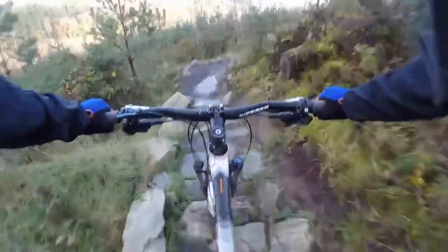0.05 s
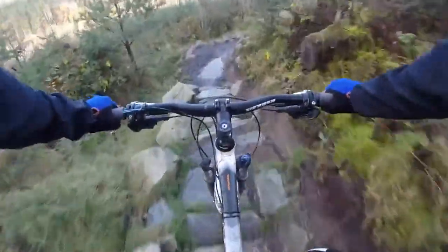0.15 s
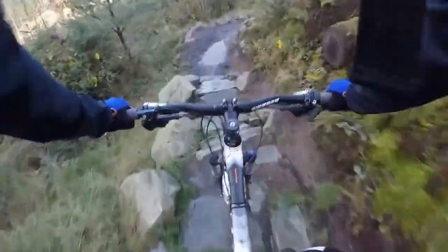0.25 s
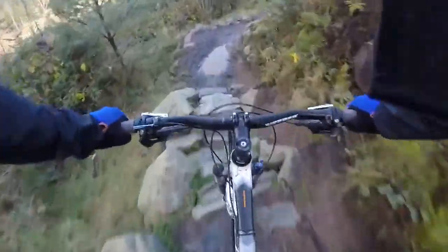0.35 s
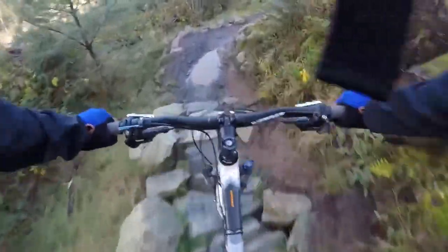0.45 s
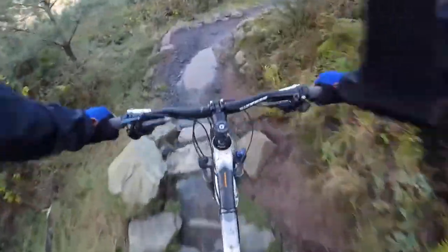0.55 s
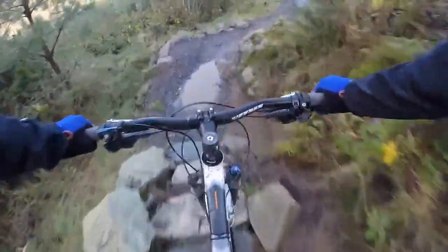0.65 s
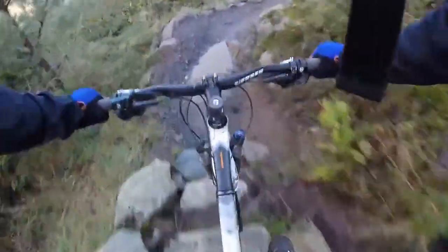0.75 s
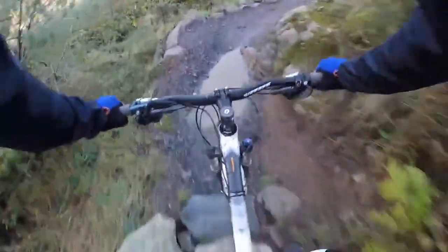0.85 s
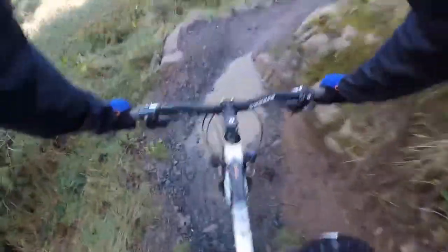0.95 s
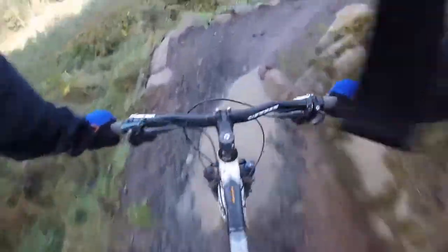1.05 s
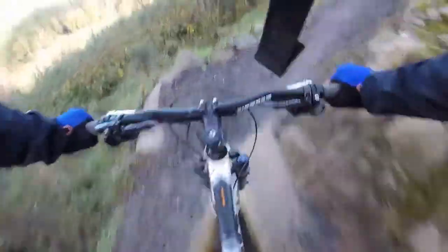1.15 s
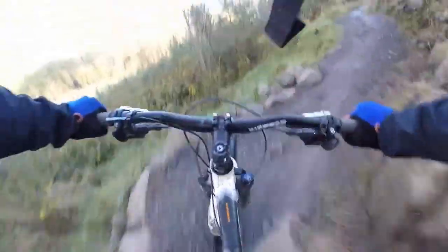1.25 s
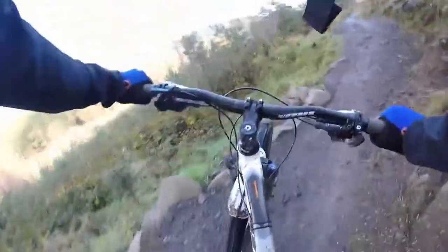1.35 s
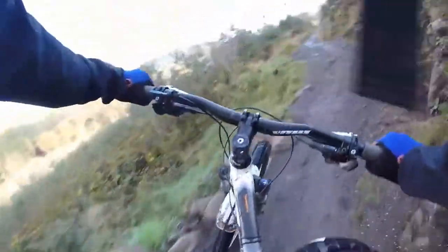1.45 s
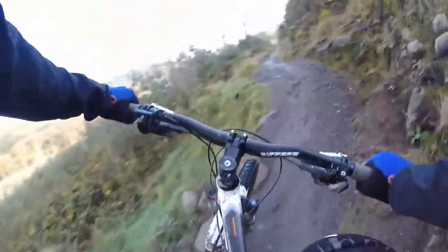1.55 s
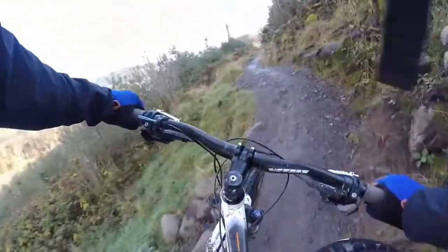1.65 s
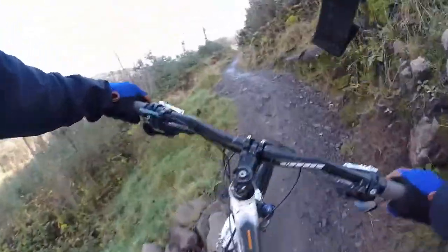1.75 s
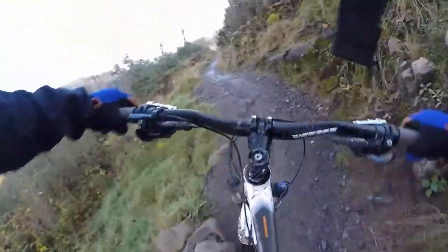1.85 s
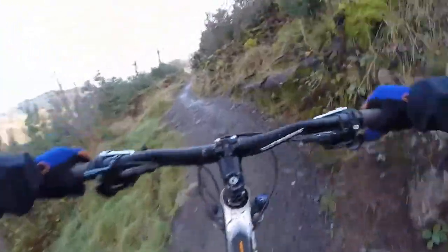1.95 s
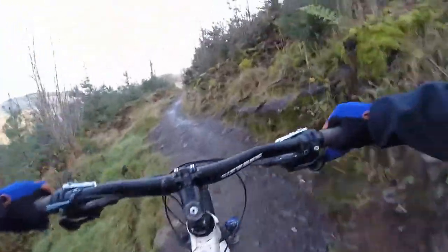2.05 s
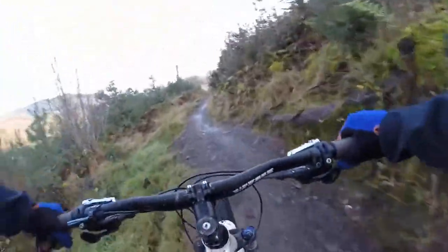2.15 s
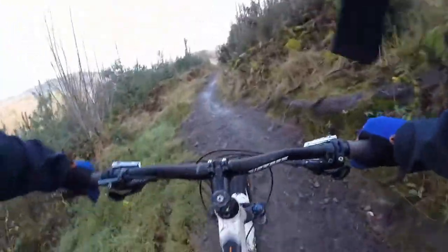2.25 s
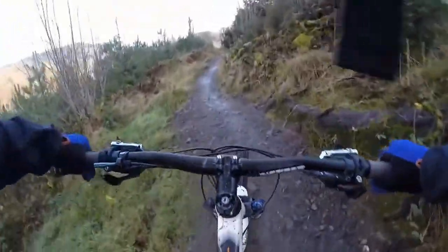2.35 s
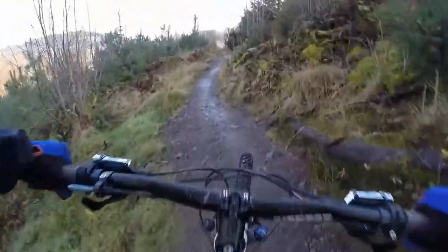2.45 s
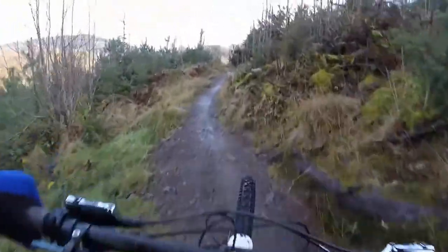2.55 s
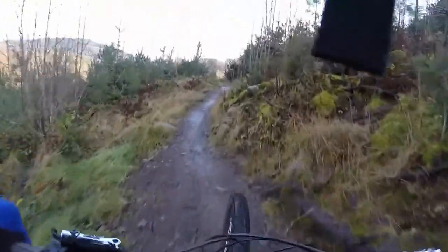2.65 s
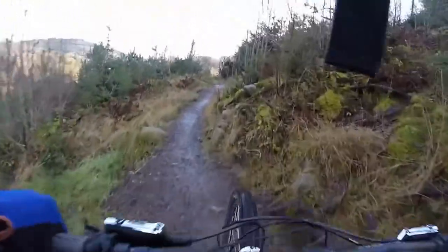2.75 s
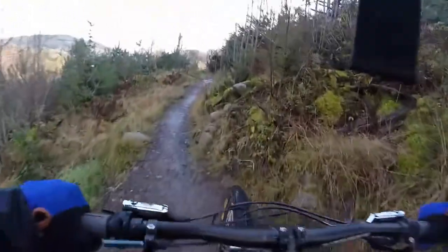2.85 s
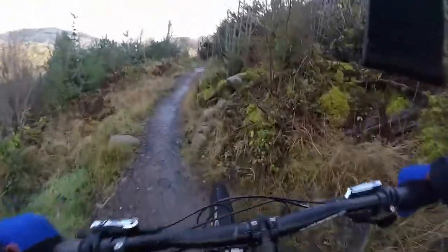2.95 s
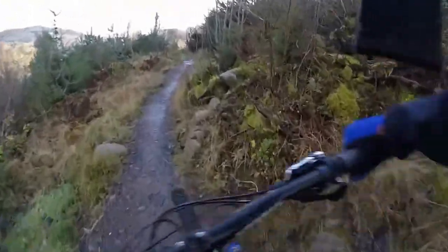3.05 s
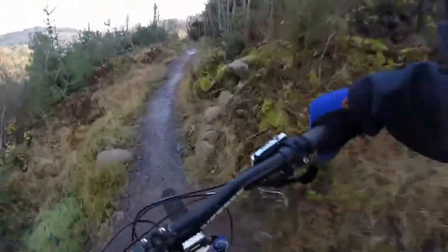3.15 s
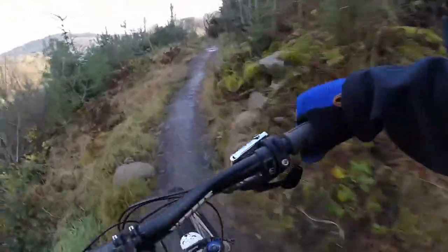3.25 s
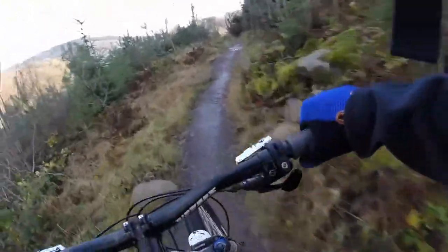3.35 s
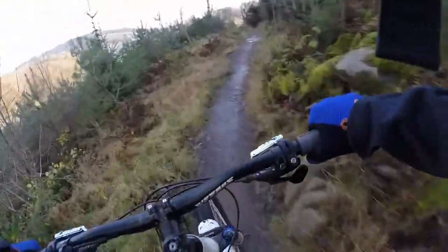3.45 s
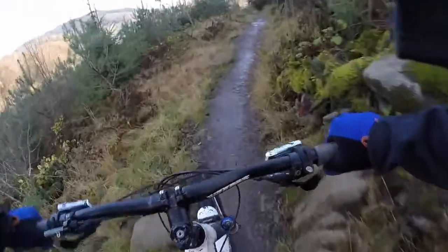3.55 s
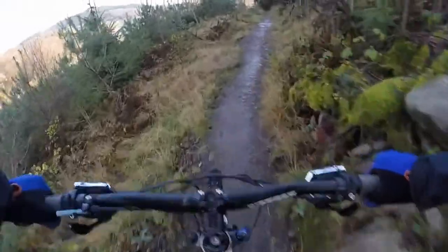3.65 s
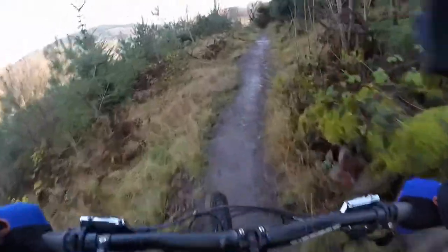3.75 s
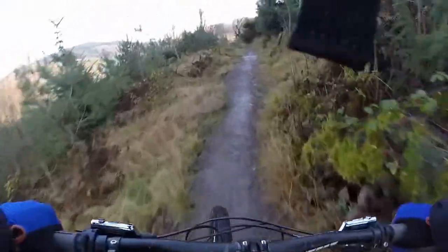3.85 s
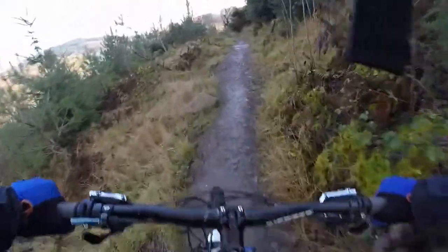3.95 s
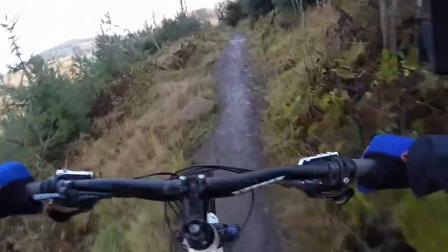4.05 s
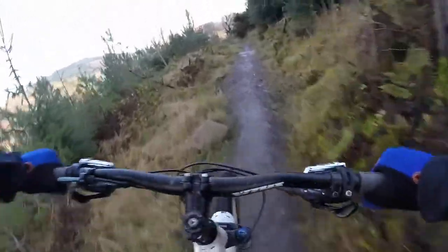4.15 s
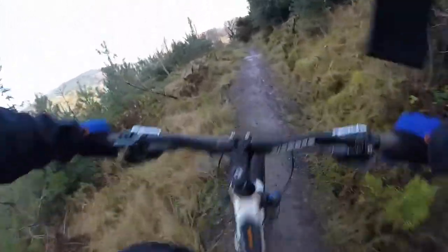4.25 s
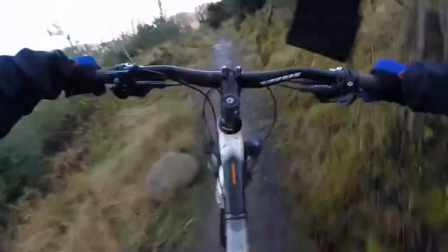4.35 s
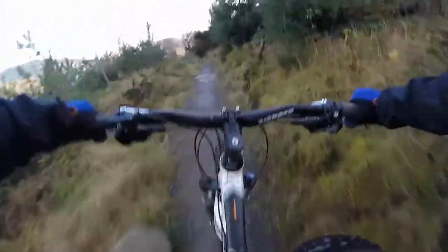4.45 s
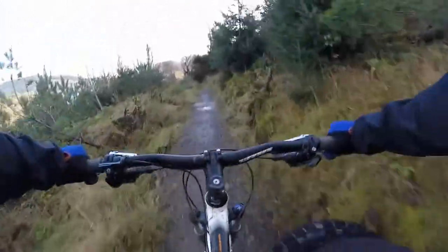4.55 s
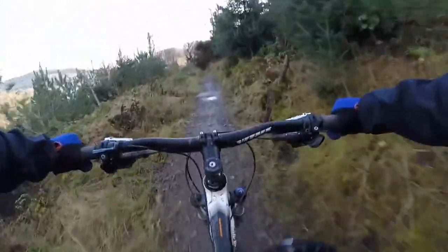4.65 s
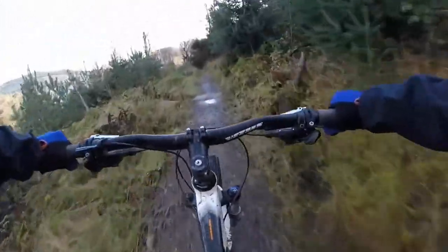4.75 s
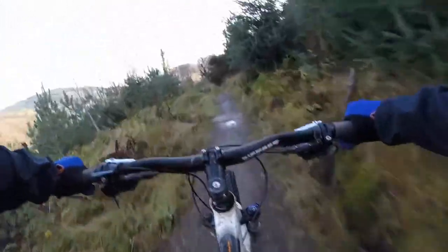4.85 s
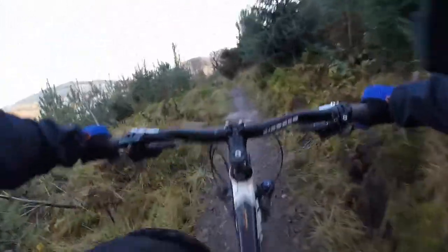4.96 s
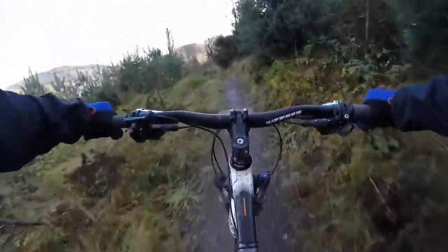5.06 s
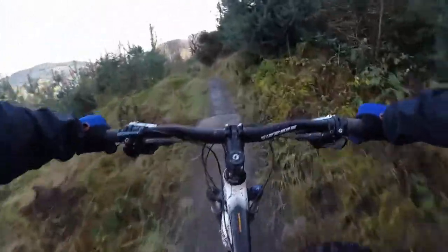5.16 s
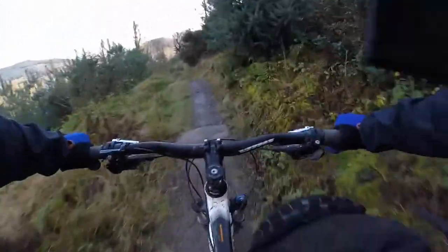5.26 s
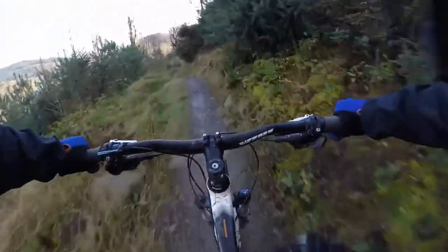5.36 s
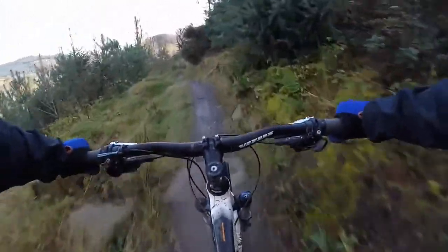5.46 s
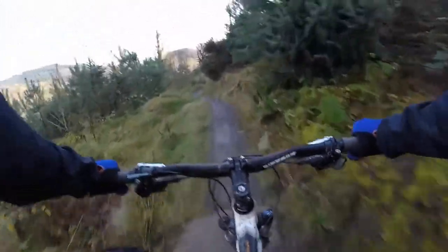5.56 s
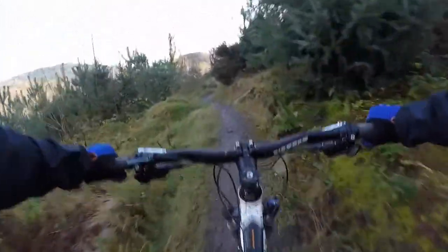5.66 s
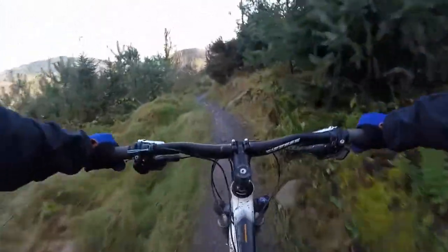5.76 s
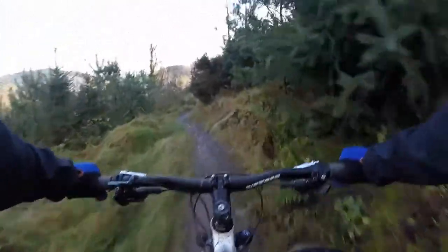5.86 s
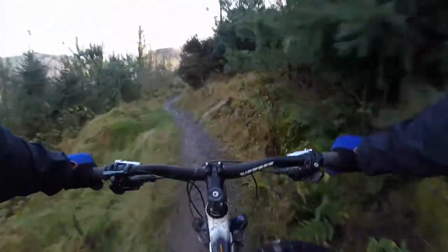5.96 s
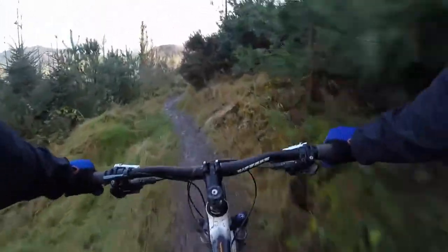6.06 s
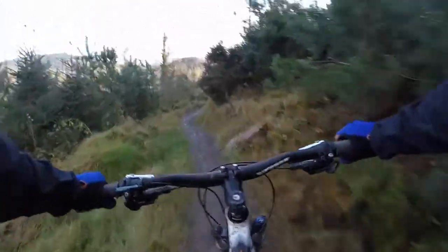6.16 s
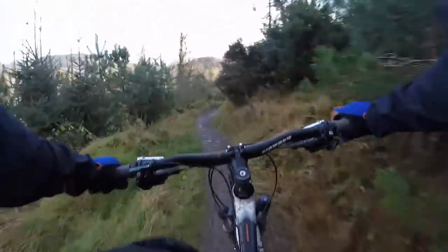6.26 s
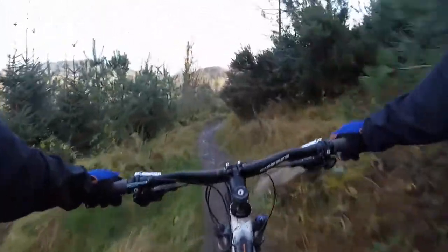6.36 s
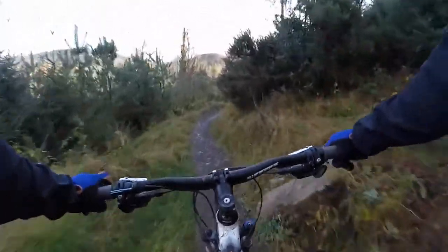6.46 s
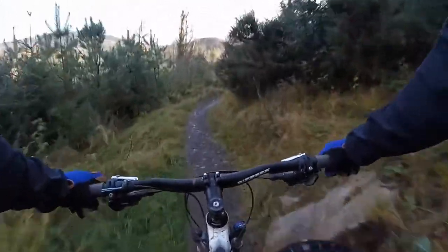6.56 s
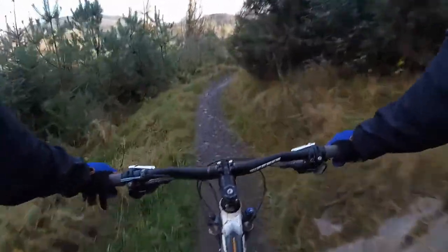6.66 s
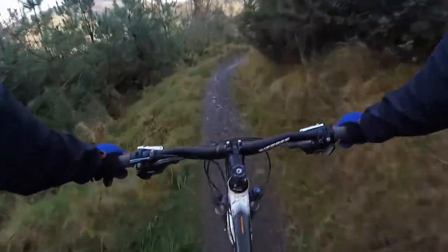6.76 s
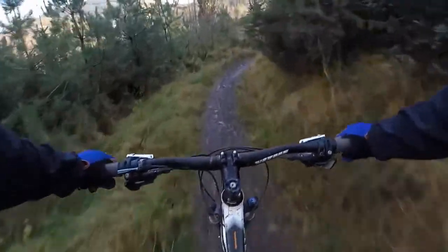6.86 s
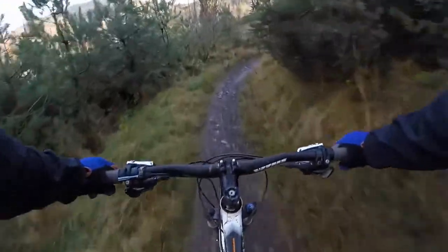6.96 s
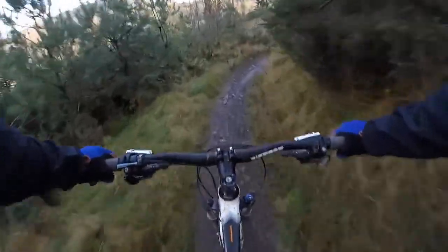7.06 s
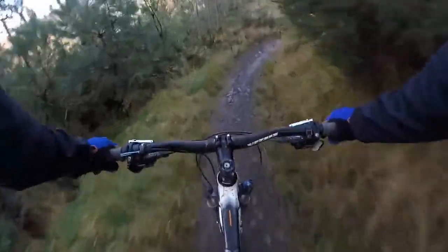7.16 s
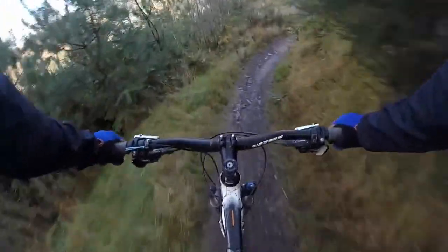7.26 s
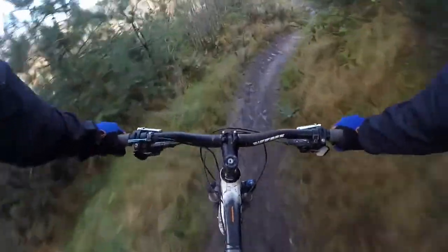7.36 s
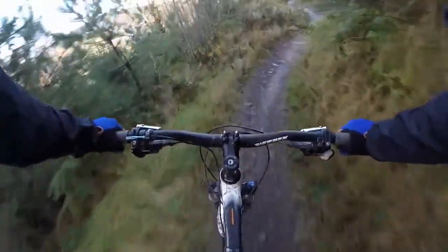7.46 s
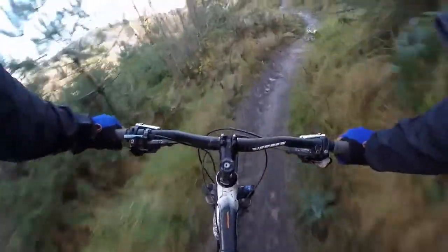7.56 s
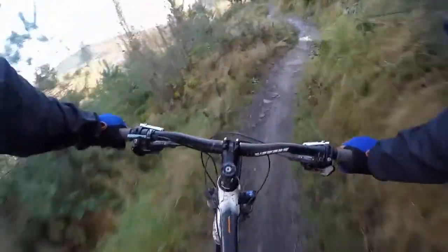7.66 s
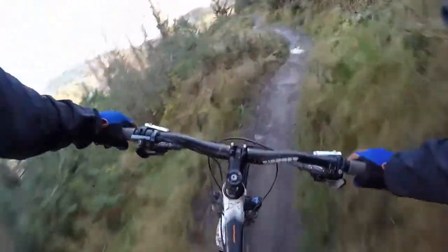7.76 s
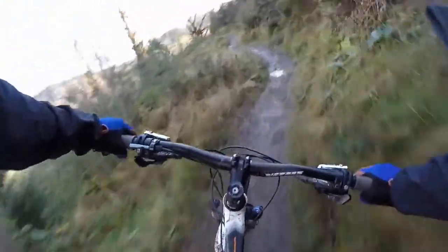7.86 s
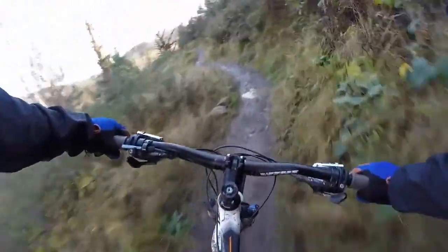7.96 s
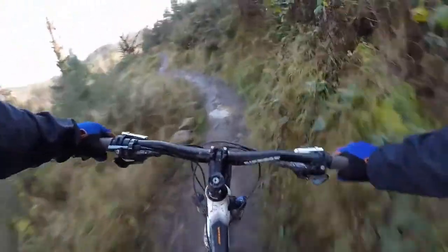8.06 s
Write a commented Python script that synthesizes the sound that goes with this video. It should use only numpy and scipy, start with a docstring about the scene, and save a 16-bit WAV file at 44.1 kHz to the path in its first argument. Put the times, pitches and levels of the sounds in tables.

```python
"""Heavy jolts and knocks as a mountain bike drops over rock steps, then lighter crunch on trail gravel.
The microphone rides in a small closed camera strapped to the rider's chest, a body's height off the dirt.
Body jolts, wind and the rider's fast heartbeat come through the housing as close, deep rumble.
Tyre crunch, rustling straps and knocks of bike and mount arrive coloured by the housing's resonances."""
import sys
import numpy as np
from scipy import signal
from scipy.fft import rfft, irfft
from scipy.io import wavfile
from scipy.ndimage import uniform_filter1d

SR = 44100
rng = np.random.default_rng(int(sys.argv[2]) if len(sys.argv) > 2 else 0)


def transcribe(signal):
    """Save signal, clipped to [-1, 1], as a 16-bit WAV file at the path in sys.argv[1]."""
    frames = np.atleast_2d(signal).T
    limited = np.clip(frames, -1, 1)
    pcm = np.round(limited * 32767).astype(np.int16)
    wavfile.write(sys.argv[1], SR, pcm)


N = 357210
TIME = np.arange(N) / SR

# Heavy landings, felt right at the camera. Each row: start in seconds, peak in dB, final pitch in Hz.
JOLTS = [(0.085, -17.5, 24), (0.319, -9, 30.5), (0.449, -15.5, 29.4), (0.605, -14.5, 39.3),
         (0.684, -16.5, 31), (0.746, -11, 37.8), (0.784, -9, 23.9), (0.891, -15, 26.3), (.927, -9, 27.2),
         (1.143, -10.5, 25.4), (1.208, -16, 32.2), (1.265, -9.5, 23.4), (5.523, -16.5, 24.6),
         (6.211, -23, 24.5), (6.261, -30.5, 54.4), (7.185, -20, 20.8)]
# Knocks of bike and mount. Each row: start in seconds, peak of the middle ring in dB,
# low ring and high ring in dB relative to it, decay time of the rattle in ms.
KNOCKS = [(0.055, -39, -15, 8, 6.4), (0.135, -38, -9, -8, 2.6), (0.1688, -32, -8, -9, 1.4),
          (0.3139, -19, -13, -6, 1.2), (0.378, -32.5, -2, -11, 1.8), (0.391, -28.5, -12, -10, 3.7),
          (0.4686, -38, 1, 4, 4.3), (0.6147, -24, -16, -10, 1.5), (0.745, -27.5, -1.5, -20, 1.9),
          (0.861, -31, -4, -13, 3.3), (0.878, -35.5, -12, 7, 1.9), (1.0038, -22.5, -5, -11, 1.9),
          (1.0265, -27, -10, -16, 3.3), (1.111, -27, -34, -16, 4.4), (1.2943, -27, -24, -1, 3.7),
          (1.343, -35, -30, 5, 2.6), (1.39, -24, -3, -10, 3), (1.568, -42, 6, 2, 3),
          (1.8098, -31, -0.5, -13, 10), (1.887, -36, -4, -9, 2.3), (1.991, -34.5, -35, 2, 12),
          (2.2675, -50, -27, -9, 2.6), (2.536, -30, -22, -30, 5.6), (2.709, -41, -27, -3, 2.2),
          (3.486, -42, -7, 1, 2.8), (3.5562, -38, -16, -12, 1.5), (3.5897, -42, -1, -6, 5.2),
          (3.6339, -24.5, -16, -7, 0.28), (3.637, -25.5, -38, -25, 1.2), (3.7988, -44, -8, -1, 2.4),
          (3.876, -35, -9, -20, 3.1), (4.014, -24, -6, -12, 2.9), (4.3394, -35, -12, -19, 2.7),
          (5.078, -36.5, -1.5, -2, 1.5), (5.822, -32, -24, -1, 1.1), (6.024, -38, -7, -20, 4.2),
          (6.1214, -28, -8, -14, 6.3), (6.317, -57, 14, -5, 1.8), (6.641, -33, -10, -26, 5.3),
          (6.841, -43, -8, -19, 1.8), (6.93, -27, -18, -11, 2.9), (6.937, -29, -11, -12, 5.4),
          (6.979, -42, -14, -4, 2.2), (7.1448, -35.5, -36, 0, 5), (7.232, -34, -6, -4, 0.3),
          (7.291, -39.5, -19, -2, 2.8), (7.326, -37, -18, -12, 1.9), (7.396, -30.5, -5, -18, 1.5),
          (7.4126, -31, -17, 4.5, 1.5), (7.425, -44, -19, 3, 3), (7.8383, -44, -15, -10, 2.2),
          (7.853, -28, -14, -17, 4.6), (7.8936, -28.5, -15, -19, 12), (7.9527, -45, -27, -10, 2.2),
          (7.973, -24, -24, -12.5, 5.9), (8.037, -39, -29, -9, 2.4), (8.0493, -31, -10, -22, 4.9)]
# Short rings of the struck frame and mount. Each row: pitch in Hz, width in Hz, level in dB.
FRAME_LOW = [(300, 150, 0), (470, 150, -2), (660, 60, 0), (870, 90, -4)]
FRAME_MID = [(1130, 55, -6), (1540, 140, -4), (1900, 130, -7), (2230, 135, 3), (2750, 400, -11)]
FRAME_HIGH = [(3400, 400, -3), (4330, 300, 0), (5450, 300, -6), (7300, 500, -13)]
# Short pings: flung grit hitting the housing, and some sharp knocks of bike and mount with one clear pitch.
# Each row: start in seconds, ping peak in dB, ping pitch in Hz, airy click peak in dB.
PINGS = [(.08, -42, 4300, -46), (0.108, -34, 5750, -48), (0.225, -41, 5030, -48),
         (.314, -17.5, 2100, -44), (0.5183, -33.5, 5440, -48), (.948, -28.5, 4100, -40),
         (.949, -38, 7300, -50), (0.896, -30, 2510, -56), (.917, -43, 2440, -52),
         (.965, -37, 2300, -60), (.633, -39, 2590, -60), (.688, -36, 5200, -52), (.7, -41, 2100, -60),
         (0.951, -34, 5530, -46), (1.002, -50, 3970, -53), (1.008, -42, 7500, -51),
         (1.092, -45, 5600, -44), (1.219, -36, 5600, -40), (1.234, -38, 3200, -42),
         (1.377, -38, 5600, -39), (1.411, -38, 5600, -44), (1.34, -36, 4600, -42),
         (1.9106, -50, 5600, -51), (1.9644, -48, 3600, -48), (2.217, -44, 3840, -65),
         (2.468, -51, 4330, -65), (2.698, -52, 5170, -56), (2.872, -55, 5600, -54),
         (2.946, -58, 11800, -45), (3.052, -42, 3430, -60), (3.062, -35, 2930, -62),
         (4.015, -36, 1600, -60), (3.637, -45, 1140, -70), (6.126, -28, 2150, -65),
         (7.977, -38.5, 1120, -70), (3.818, -43, 2520, -65), (4.899, -39.5, 1680, -68),
         (5.5884, -40, 5450, -47), (5.822, -36, 2110, -58), (6.379, -47, 5900, -50),
         (6.773, -42, 5860, -56), (7.167, -31, 5360, -49), (7.233, -42, 2700, -47),
         (7.414, -32, 3100, -50), (7.415, -38, 4300, -54), (7.907, -46.5, 5470, -54),
         (8.036, -32.5, 1730, -56)]

# Steady tyre crunch from below. Each row: time in seconds, then gravel, grit and spray in dB.
CRUNCH_LEVELS = [(0.0, -48.5, -53, -70), (0.29, -51, -55, -72), (0.9, -49.5, -56.5, -70),
                 (1.15, -49, -52, -70), (1.26, -49, -45, -53), (1.37, -43, -44, -53.5),
                 (1.56, -47, -51, -63), (1.71, -53.5, -54.5, -62.5), (2.07, -55.5, -60, -88),
                 (2.39, -56.5, -59, -76), (2.8, -59, -65, -75), (3.68, -58.5, -64.5, -74.5),
                 (4.15, -55.5, -61.5, -72.5), (4.4, -53.5, -55.5, -68), (4.65, -57, -61, -75),
                 (6.07, -57, -61.5, -74.5), (6.95, -57.5, -64, -73), (8.1, -52, -59, -71)]
# Loose stones under a wheel. Each row: peak time in seconds, gravel, grit and spray in dB, fall in seconds.
LOOSE_STONES = [(0.056, -46, -46.5, -63, 0.022), (0.16, -44.5, -51.5, -72, 0.026),
                (0.293, -43, -43.5, -68, 0.015), (0.404, -43.5, -43.5, -72, 0.018),
                (0.47, -44, -53, -80, 0.038), (0.556, -46.5, -46, -61, 0.076),
                (0.655, -57, -41, -60, 0.021), (0.747, -56, -45.5, -78, 0.014),
                (0.864, -39.5, -44.5, -64, 0.064), (1.036, -39.5, -44, -64, 0.024),
                (1.107, -47, -41, -51, .03), (1.123, -33.5, -37, -53, 0.072), (1.19, -32, -37, -59, 0.031),
                (1.233, -29.5, -29.5, -42, 0.018), (1.264, -34, -48, -54, .008),
                (1.293, -30.5, -29, -49, 0.014), (1.298, -26, -35, -53, 0.016),
                (1.317, -28, -34, -52, 0.012), (1.165, -38, -39, -54, 0.013), (1.346, -34, -39, -53, 0.023),
                (1.399, -37, -42, -55, 0.015), (1.644, -42.5, -51, -64, 0.043),
                (1.808, -59, -66, -80, 0.014), (1.984, -48.5, -50.5, -66.5, 0.14),
                (2.23, -64, -58, -69, 0.073), (2.124, -48.5, -58, -75, 0.017),
                (2.734, -46.5, -66, -80, 0.057), (3.066, -49, -59, -78, 0.083),
                (3.241, -49, -59, -75, 0.027), (3.377, -57, -66, -81, 0.044), (3.893, -56, -68, -84, 0.044),
                (4.027, -49, -74, -77, 0.026), (4.24, -55, -57, -70, 0.13), (4.304, -55, -55, -66, .08),
                (4.367, -48.5, -52, -67, 0.039), (4.594, -55, -61, -66, 0.033),
                (4.723, -65, -64, -76, 0.026), (4.776, -72, -60, -71, 0.099),
                (5.058, -52, -55.5, -67, 0.11), (5.273, -59, -58, -66, 0.037),
                (5.486, -55, -59, -78, 0.046), (5.603, -50, -53, -66, 0.051),
                (5.813, -52, -49.5, -63, 0.058), (6.125, -52.5, -61, -82, 0.24),
                (6.352, -51.5, -57.5, -78, 0.046), (6.552, -68, -60, -69, 0.023),
                (6.714, -51.5, -55, -64.5, 0.082), (6.938, -43, -75, -92, 0.016),
                (6.987, -65, -58.5, -73, 0.062), (7.166, -47.5, -53.5, -72, 0.035),
                (7.432, -49, -57, -76, 0.037), (7.846, -51, -72, -77, 0.048),
                (8.033, -55, -47, -67, 0.0082)]
# Resonances of the housing around the microphone. Each row: pitch in Hz, width in Hz, level in dB.
HOUSING_HOLLOW = [(490, 230, -8.5), (970, 157, -6), (1150, 356, -7.5)]
HOUSING_SHELL = [(1462, 290, -2), (1624, 543, 1.5), (1970, 200, 1.5), (2393, 290, 0), (3080, 450, -8.5)]
HOUSING_BRIGHT = [(3600, 960, 11.5), (4390, 620, 13), (5600, 560, 13.5), (7100, 1500, -10)]
HOUSING_AIRY = [(7500, 410, 9), (9860, 1160, 5), (11840, 2000, 3), (14600, 2400, -3)]
# Wheel and pad rubs. Each row: start and length in seconds, pitch and width in Hz, level in dB.
RUBS = [(0.265, 0.024, 1680, 250, -46), (0.634, 0.028, 1650, 250, -46), (1.173, 0.037, 2270, 500, -42),
        (1.29, 0.034, 2360, 450, -29.5), (1.294, 0.035, 1630, 400, -34), (4.323, 0.063, 2300, 300, -51),
        (4.96, 0.25, 1477, 80, -56.5), (2.226, 0.033, 2210, 500, -51), (2.262, .05, 2230, 500, -52),
        (2.618, 0.12, 2330, 500, -53), (2.703, 0.11, 2350, 400, -50), (3.044, .05, 2300, 500, -67),
        (3.182, 0.082, 2230, 400, -52.5), (3.644, 0.027, 1850, 80, -55), (3.878, 0.079, 2280, 200, -57),
        (4.021, 0.06, 1446, 90, -55.5), (4.292, 0.11, 10300, 600, -65), (4.689, 0.077, 2280, 500, -53.5),
        (5.01, 0.11, 1490, 60, -57), (6.011, 0.047, 2420, 500, -49), (6.691, .07, 2300, 500, -68),
        (6.947, 0.051, 1745, 79, -53), (7.412, 0.039, 1250, 500, -47.5), (7.577, 0.2, 4500, 400, -59.5),
        (7.481, 0.23, 2450, 250, -57.5), (7.69, 0.099, 2480, 250, -51)]

# Heartbeats through the chest strap. Each row: time in seconds, peak in dB.
HEARTBEATS = [(1.671, -21.5), (2.035, -22), (2.394, -23), (2.759, -24.5), (3.105, -20.5), (3.47, -21.5),
              (3.831, -17.5), (4.187, -20.5), (4.543, -23), (4.908, -18), (5.26, -24), (5.616, -25.5),
              (5.978, -21.5), (6.337, -24.5), (6.692, -23), (7.049, -20.5), (7.408, -25), (7.764, -22)]
# Steady shaking of the housing. Each row: time in seconds, then rumble, strap flutter and buffeting in dB.
SHAKE_LEVELS = [(0.0, -16.5, -52, -48), (0.18, -24, -40, -50.5), (0.45, -24.5, -47, -49),
                (0.86, -20, -46, -50), (1.2, -21.5, -48, -45), (1.4, -28.5, -41, -54),
                (1.71, -32, -44.5, -57.5), (2.71, -30.5, -47, -53), (2.95, -35, -48.5, -54.5),
                (3.31, -40.5, -50.5, -57), (4.15, -33.5, -55, -56), (4.42, -34.5, -48, -54.5),
                (4.85, -31.5, -46, -53.5), (5.37, -33, -50.5, -56.5), (5.68, -26, -51, -55),
                (5.96, -31, -44, -54), (6.18, -29, -49.5, -52), (6.56, -32, -47, -57),
                (6.88, -33, -48, -53.5), (7.11, -29, -48, -55.5), (7.45, -36, -51, -55),
                (8.1, -26.5, -50, -54.5)]
# The strap flaps on a bump. Each row: peak time in seconds, flutter and buffeting in dB, fall in seconds.
STRAP_FLAPS = [(.06, -45, -60, .03), (0.125, -55, -43.5, 0.041), (0.24, -31.5, -42, 0.015),
               (0.378, -29.5, -47, 0.044), (0.469, -26, -41, 0.015), (0.702, -24.5, -44, 0.04),
               (0.869, -48, -41, 0.028), (1.017, -26.5, -44.5, 0.048), (1.097, -30.5, -59, 0.11),
               (1.314, -36, -42.5, 0.075), (1.563, -52, -45, 0.027), (1.81, -41, -44, 0.026),
               (1.957, -38, -48, 0.076), (3.213, -39, -48.5, 0.078), (3.975, -39, -70, 0.036),
               (4.346, -28.5, -45.5, 0.056), (4.536, -30.5, -50, 0.025), (4.712, -36, -49, 0.018),
               (5.088, -32, -54, 0.015), (5.82, -37, -47, 0.037), (6.125, -52, -47, 0.026),
               (6.271, -37, -60, .015), (6.32, -50, -46.5, 0.012), (6.75, -55, -54.5, .04),
               (6.82, -35, -48, 0.023), (7.205, -56, -53, 0.025), (7.42, -38.5, -50, 0.11),
               (7.605, -41, -51, 0.033), (7.868, -44, -62, 0.097)]
# Spectra of the shaking. Each row: frequency in Hz, relative spectral density in dB.
RUMBLE_SPECTRUM = [(5.9, -9.5), (10, 6.5), (22, 6.5), (35, -0.5), (84, -17.5), (150, -27), (200, -45),
                   (330, -120)]
FLUTTER_SPECTRUM = [(50, 0.5), (80, 4), (130, -2), (200, -12), (320, -82)]
BUFFET_SPECTRUM = [(88, -43), (150, -2), (226, 0), (728, -16.5), (1400, -20), (1820, -52), (3080, -120)]


def body_jolts():
    """The body lands on a step and the strap swings the camera once or twice."""
    out = np.zeros(N)
    for start, db, hz in JOLTS:
        swing = thump(1.3 * hz, hz, glide_s=.012, rise_s=.012, fall_s=.022)
        add(out, start, undb(db) * swing)
    return out


def frame_knocks():
    """Each knock is a first contact and a brief rattle after it that set off all parts of the frame."""
    out, t = np.zeros(N), TIME[:SR // 12]
    rattles = rng.standard_normal((len(KNOCKS), len(t)))
    tunings = 1 + .02 * rng.standard_normal(len(KNOCKS))  # each blow lands on another spot
    for (start, db, low_db, high_db, decay_ms), rattle, tuning in zip(KNOCKS, rattles, tunings):
        blow = (rattle + 9 * (t == 0)) * np.exp(-t * 1000 / max(decay_ms, .3))
        dull = signal.lfilter(np.hanning(10), 1, blow)
        crisp = signal.lfilter(np.diff(np.hanning(11)), 1, blow)
        parts = (dull, FRAME_LOW, low_db), (dull, FRAME_MID, 0), (crisp, FRAME_HIGH, high_db)
        for push, modes, part_db in parts:
            part = ring(push, [(hz * tuning, width, level) for hz, width, level in modes])
            add(out, start, undb(db + part_db) * part / np.abs(part).max())
    return out


def pings():
    """A hard grain or a sharp knock close to the microphone: a short ping and a sharp airy click."""
    out, t = np.zeros(N), TIME[:SR // 40]
    noises = rng.standard_normal((len(PINGS), len(t)))
    for (start, ping_db, hz, click_db), noise in zip(PINGS, noises):
        blow = (noise + 4 * (t == 0)) * np.exp(-t / .0015)
        mode = [(hz, 90 + hz / 11, 0)]
        ping = ring(ring(blow, mode), mode)
        click = ring(np.diff(blow, prepend=0), HOUSING_AIRY)
        for part, db in ((ping, ping_db), (click, click_db)):
            add(out, start, undb(db) * part / np.abs(part).max())
    return out


def tyre_crunch():
    """Gravel rings the housing's shell, grit its bright modes, mud spray the top; they share cracks."""
    times, *peaks_db, falls = np.transpose(LOOSE_STONES)
    gains = [swells(steady, times, peak, falls) for steady, peak in zip(curves(CRUNCH_LEVELS), peaks_db)]
    gravel = cracking_stones(per_s=1600, spread_db=5, hiss=1.16, patchy_db=.98)
    grit = cracking_stones(per_s=2000, spread_db=4.5, hiss=1.2, patchy_db=2.3) + .4 * gravel
    spray = cracking_stones(per_s=900, spread_db=4, hiss=1.5, patchy_db=1) + .6 * grit
    muddy_spray = unit(spray) + undb(-8) * mud_spatter()
    muddy_grit = unit(grit) + undb(-7.5) * mud_spatter()
    shell = unit(ring(gravel, HOUSING_SHELL, flicker_db=.8))
    hollow = undb(-8.5) * unit(ring(gravel, HOUSING_HOLLOW, flicker_db=2))
    bright = unit(ring(muddy_grit, HOUSING_BRIGHT, flicker_db=-.2))
    airy = unit(ring(muddy_spray, HOUSING_AIRY))
    return sum(gain * layer for gain, layer in zip(gains, (shell + hollow, bright, airy)))


def cracking_stones(per_s, spread_db, hiss, patchy_db):
    """Stones crack at random moments, some louder than the rest, over a hiss; all of it in patches."""
    hits = rng.random(N) < per_s / SR
    size = np.minimum(rng.exponential(size=N), 3.8)
    polarity = np.sign(rng.standard_normal(N))
    cracks = unit(hits * undb(spread_db * size) * polarity)
    return (cracks + hiss * rng.standard_normal(N)) * undb(patchy_db * wander(45))


def mud_spatter(per_s=76, tail_s=.0079):
    """Drops of mud: each starts sharply and fizzes out."""
    drops = (rng.random(N) < per_s / SR) * rng.exponential(size=N)
    tails = signal.lfilter([1], [1, -np.exp(-1 / (tail_s * SR))], drops)
    return unit(tails * rng.standard_normal(N))


def wheel_rubs():
    """A wheel scrapes or a pad drags for a moment: stuttering noise in one narrow band."""
    out = np.zeros(N)
    noises = rng.standard_normal((len(RUBS), SR // 4))
    stutter = undb(3 * wander(90))
    for (start, length_s, hz, width, db), noise in zip(RUBS, noises):
        band = [(hz, width, 0)]
        scrape = unit(ring(ring(noise, band), band))[:int(length_s * SR)]
        add(out, start, undb(db) * scrape * np.sqrt(np.hanning(len(scrape))))
    return out * stutter


def heartbeat(lag_s=.0172):
    """Each beat presses the chest directly against the housing, never twice alike."""
    out = np.zeros(N)
    variations = 1 + .18 * rng.standard_normal((len(HEARTBEATS), 3))
    for (start, db), (high, low, fall) in zip(HEARTBEATS, variations):
        beat = thump(72 * high, 31 * low, glide_s=.018, rise_s=.008, fall_s=.024 * fall)
        add(out, start + lag_s, undb(db) * beat)
    return out


def housing_shake():
    """Rumble, flutter of the strap and the faster buffeting of wind on the housing, all in gusts."""
    rumble_db, flutter_db, buffet_db = curves(SHAKE_LEVELS)
    flap_s, flap_db, puff_db, flap_falls = np.transpose(STRAP_FLAPS)
    beat_s, beat_db = np.transpose(HEARTBEATS)
    # The strap flaps on bumps and also shivers faintly with each heartbeat.
    times = np.r_[flap_s, beat_s + .005]
    peaks_db = np.r_[flap_db, beat_db - 23.5]
    falls = np.r_[flap_falls, np.full(len(beat_s), .1)]
    gust = wander(12)
    rumble = unit(coloured(RUMBLE_SPECTRUM) * undb(3 * gust))
    flutter = unit(coloured(FLUTTER_SPECTRUM) * undb(1.1 * gust + 1.4 * wander(22)))
    flutter += undb(-7) * strap_nudges()
    buffet = unit(coloured(BUFFET_SPECTRUM) * undb(1.9 * wander(30)))
    return (undb(rumble_db) * rumble
            + swells(flutter_db, times, peaks_db, falls) * flutter
            + swells(buffet_db, flap_s, puff_db, flap_falls) * buffet)


def strap_nudges(per_s=22):
    """Small uneven bumps of the strap at random moments."""
    pushes = (rng.random(N) < per_s / SR) * rng.standard_normal(N)
    bump = thump(95, 47.5, glide_s=.011, rise_s=.0026, fall_s=.019)
    return unit(signal.fftconvolve(pushes, bump)[:N])


def steady_hiss():
    """A faint, even hiss under all the crunch, coloured by the housing."""
    hiss = rng.standard_normal(N)
    bands = (HOUSING_HOLLOW, -66), (HOUSING_SHELL, -65.5), (HOUSING_BRIGHT, -68), (HOUSING_AIRY, -90)
    return sum(undb(db) * unit(ring(hiss, modes)) for modes, db in bands)


def thump(start_hz, end_hz, glide_s, rise_s, fall_s):
    """A soft push whose ringing drops in pitch and dies within two or three swings; peak 1."""
    t = TIME[:SR // 4]
    turns = end_hz * t + (start_hz - end_hz) * glide_s * (1 - np.exp(-t / glide_s))
    wave = -np.sin(2 * np.pi * turns) * (1 - np.exp(-t / rise_s)) * np.exp(-t / fall_s)
    return wave / np.abs(wave).max()


def ring(x, modes, flicker_db=0):
    """Parallel resonances that can each flicker; alternating signs fill the valleys between them."""
    out = 0
    for k, (hz, width, db) in enumerate(modes):
        flicker = flicker_db * wander(18) if flicker_db else 0
        resonance = signal.lfilter(*signal.iirpeak(hz, hz / width, SR), x)
        out += (-1) ** k * undb(db + flicker) * resonance
    return out


def swells(steady_db, times, peaks_db, falls, rise_share=.36):
    """Gain of a steady level with swells on top that rise fast and drop to 1 / e in their fall time."""
    power = undb(steady_db) ** 2
    for peak_s, db, fall_s in zip(times, peaks_db, falls):
        late = (TIME[::64] - peak_s) / max(fall_s, .005)
        shape = np.exp(-2 * np.maximum(late, -late / rise_share))
        power += np.repeat(undb(db) ** 2 * shape, 64)[:N]
    return np.sqrt(power)


def coloured(spectrum):
    """Noise with a spectrum of (Hz, dB) points; rms 1."""
    hz, db = np.transpose(spectrum)
    bin_hz = np.arange(N // 2 + 1) * SR / N + 1e-3
    gain = undb(np.interp(np.log(bin_hz), np.log(hz), db))
    return unit(irfft(rfft(rng.standard_normal(N)) * gain, N))


def wander(per_s):
    """Glides between random values, per_s of them a second; rms 1."""
    hold = int(SR / per_s)
    steps = np.repeat(rng.standard_normal(N // hold + 1), hold)
    return unit(uniform_filter1d(steps, hold)[:N])


def curves(table):
    """Each level column of a timed table, one value a sample."""
    times, *columns = np.transpose(table)
    return [np.interp(TIME, times, column) for column in columns]


def add(out, start_s, piece):
    """Mix a short sound in at start_s."""
    i = max(int(start_s * SR), 0)
    out[i:i + len(piece)] += piece[:N - i]


def undb(db):
    """Decibels to gain."""
    return 10 ** (np.asarray(db) / 20)


def unit(x):
    """Scale to rms 1."""
    return x / np.sqrt(np.mean(x ** 2))


def scene():
    """All sources at the one microphone on the rider's chest."""
    clatter = frame_knocks() + pings() + wheel_rubs()
    rumble = housing_shake() + heartbeat() + body_jolts()
    crunch_and_hiss = steady_hiss() + tyre_crunch()
    return (clatter + rumble + crunch_and_hiss)[None]


def record(dry, housing_hz=12800, top_hz=15300):
    """The housing dulls the highest treble and the recorder cuts the top."""
    dulled = signal.sosfilt(signal.butter(3, housing_hz, fs=SR, output="sos"), dry)
    return signal.sosfilt(signal.ellip(10, .2, 70, top_hz, fs=SR, output="sos"), dulled)


dry = scene()
out = record(dry)
transcribe(out)
```